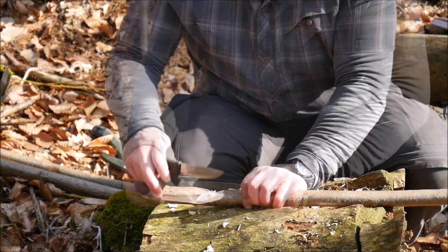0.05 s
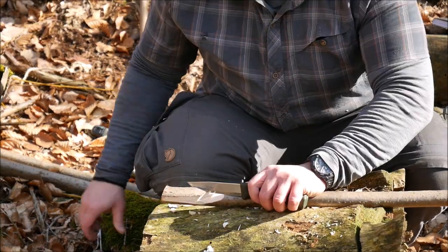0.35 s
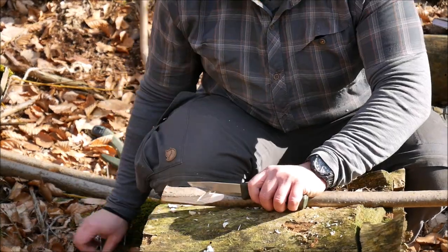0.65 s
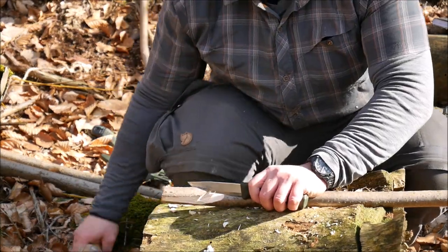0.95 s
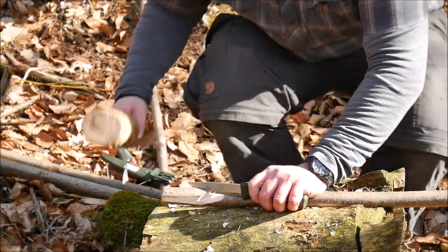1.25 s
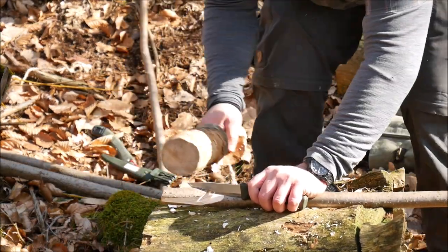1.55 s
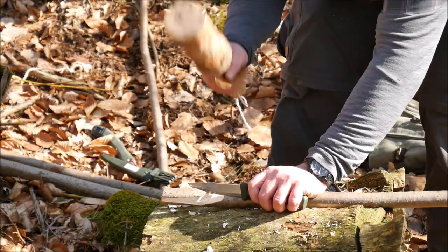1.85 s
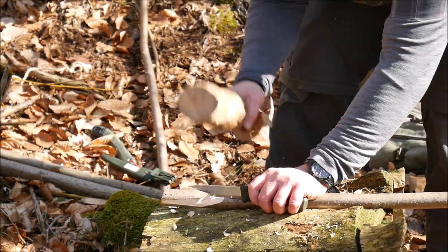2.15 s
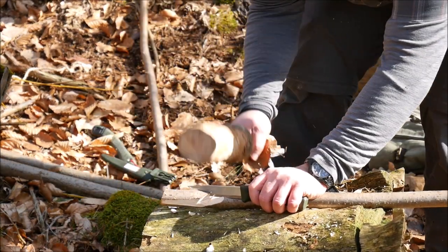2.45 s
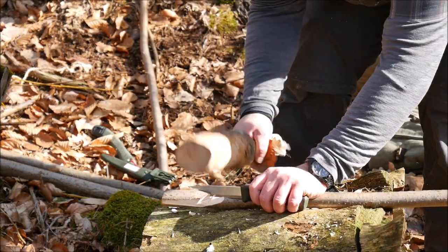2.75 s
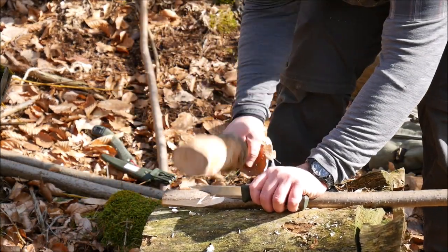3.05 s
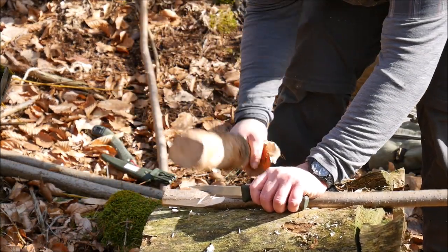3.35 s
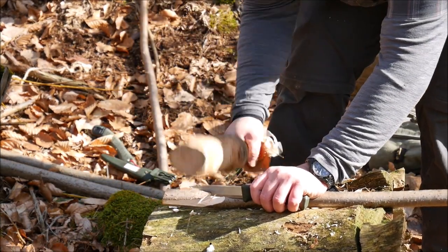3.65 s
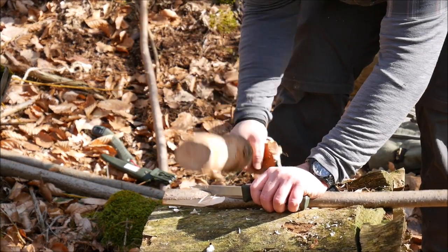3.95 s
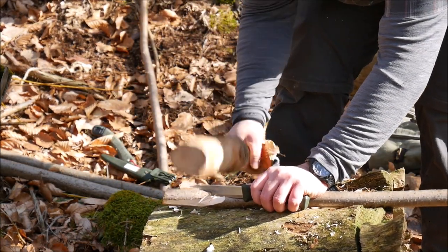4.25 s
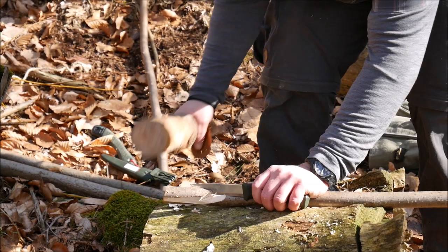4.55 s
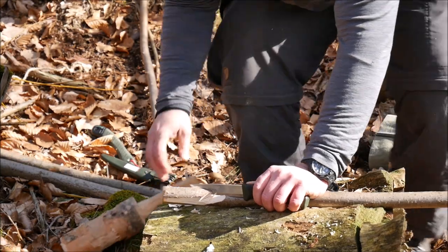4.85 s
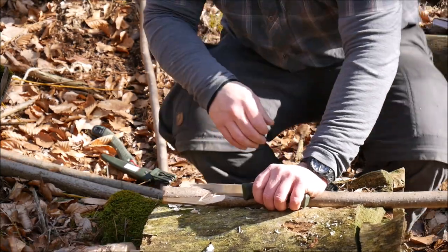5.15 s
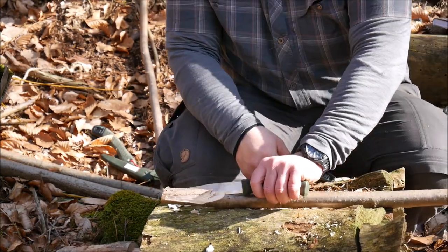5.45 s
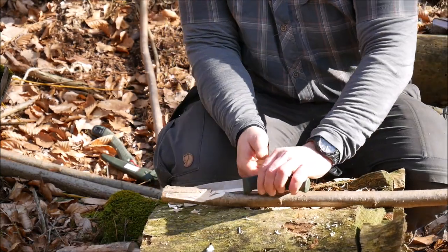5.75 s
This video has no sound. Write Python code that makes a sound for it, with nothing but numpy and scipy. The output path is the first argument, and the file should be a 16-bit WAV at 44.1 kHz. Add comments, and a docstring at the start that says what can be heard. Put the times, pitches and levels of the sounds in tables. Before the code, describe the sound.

Eight sharp, dead knocks of a wooden club driving a knife through a stick, with dry leaves rustling in a quiet, breezy wood.

```python
"""A breeze rumbles on the microphone in a quiet wood, and dry leaves stir as a man picks up a wooden club.
He knocks a knife through a stick lying on a log: eight sharp, dead blows, each exciting heavily damped
modes of wood and steel and overloading the microphone. He drops the club, which thuds and rings briefly,
and kneels again. His movements rustle leaves, snap twigs and brush his shirt. Behind him the breeze dies
away, faint far tones come and go, and one slow gust passes through the treetops."""
import sys
import numpy as np
from scipy import signal
from scipy.fft import rfft, irfft, next_fast_len
from scipy.io import wavfile
from scipy.ndimage import map_coordinates

SR = 44100
rng = np.random.default_rng(int(sys.argv[2]) if len(sys.argv) > 2 else 0)


def to_wav(s):
    """Save 16-bit WAV."""
    ch = np.atleast_2d(s).T  # columns
    pcm = np.round(np.clip(ch, -1, 1) * 32767)  # PCM
    wavfile.write(sys.argv[1], SR, pcm.astype(np.int16))


N = 265482

# The club strikes the knife's back; where it lands sets how strongly each part responds.
# Each row: start in seconds, then strength, knock, club bending, steel and crack, all in relative dB.
BLOW_EVENTS = [(2.1082, 5.5, -13, -7.5, 0.5, -7), (2.4791, 3.6, -3.5, -8, -5, 4.5),
               (2.7923, 3, -3, -8, 3, 2), (3.096, 0.5, 1, -11, -12, 4), (3.39, 1.6, -2.5, -13.5, 9.5, -0.5),
               (3.697, 0, 0.5, -16, 5, -10), (3.9938, 3.5, -3, -16, 5, 1.5),
               (4.2968, 0.5, -2.5, -15.5, 2, -5)]
# Modes of the stick on the log. Each row: frequency in Hz, relative level in dB, t60 in seconds.
STICK_MODES = [(162.3, -23.5, 0.065), (255.4, -17, 0.034), (325.4, -24.5, 0.057), (482, -24, 0.03),
               (764, 4, 0.011)]
# Modes of the knife in its cut. Each row: frequency in Hz, relative level in dB, t60 in seconds.
KNIFE_MODES = [(845, -22.5, 0.077), (965, 3, 0.014), (1246, -4, 0.0036), (1554, -11, 0.015),
               (1630, -12.5, 0.034), (1753, -11, 0.011), (2093, -3, 0.012), (2740, -10, 0.012),
               (2950, -12.5, 0.02), (3275, -11.5, 0.013), (3820, -42, 0.013), (4250, -15, 0.015),
               (4727, -14, 0.0088), (6540, -16.5, 0.0068)]
# First contact of club and knife. Each row: frequency in Hz, gain in dB.
CONTACT_SPECTRUM = [(300, -50), (1500, 16.5), (3500, -12), (5500, -2), (7000, -14.5), (8500, -27),
                    (10500, 3.5), (15000, -37)]
# Wood splitting under the edge. Each row: frequency in Hz, gain in dB.
FIBRE_SPECTRUM = [(300, -16.5), (700, -30.5), (1300, 2), (1900, 0.5), (2700, 2.5), (3600, -5), (4600, -8.5),
                  (5500, -17), (12000, -26.5)]
# Sound returned by ground and trunks. Each row: frequency in Hz, gain in dB.
SCATTER_SPECTRUM = [(100, -5), (170, 12), (260, -18), (450, -2), (850, -8), (1300, -2.5), (2100, -11.5),
                    (3200, -6.5), (5000, -8.5), (8000, -9.5), (12000, -6.5)]
# The loose club bumps log and ground.
# Each row: start in seconds, ring level in dB, ring frequency in Hz, t60 in seconds, thud gain in dB.
CLUB_BUMPS = [(0.916, -25.5, 1147, 0.06, -24), (0.959, -23, 1197, 0.11, -54),
              (4.7772, -23.5, 1195, 0.14, -0.5)]
# Modes of the club's thud. Each row: frequency in Hz, relative level in dB, t60 in seconds.
THUD_MODES = [(105, -18, 0.15), (324, -10, 0.011), (505, -15.5, 0.0045), (876, -5, 0.0038),
              (990, -21, 0.013)]
# A soft contact, which passes little treble. Each row: frequency in Hz, gain in dB.
MOSS_SPECTRUM = [(50, -43.5), (200, -1.5), (1100, 7), (1400, -9), (5000, -45)]
# Boots and knees settle. Each row: start in seconds, relative level in dB, centre frequency in Hz.
STEP_EVENTS = [(1.493, -37.5, 245), (1.646, -34.5, 242), (1.692, -42.5, 330), (2.671, -38, 940),
               (4.992, -47, 304)]
# Soil under load. Each row: multiple of the centre frequency, gain in dB.
SOIL_SPECTRUM = [(.1, -22), (.3, -5), (1, 5.5), (2, -3.5), (4, -10), (13, -34)]
# Twigs break. Each row: start in seconds, relative level in dB, centre frequency in Hz, t60 in seconds.
SNAP_EVENTS = [(0.8736, -19, 3100, 0.0023), (0.9586, -24, 3760, 0.019), (1.1433, -25.5, 2570, 0.011),
               (1.1815, -25.5, 4130, 0.013), (1.2616, -28.5, 3580, 0.01), (1.3942, -25.5, 2540, 0.0045),
               (1.7192, -20, 3800, 0.028), (2.0137, -29.5, 3700, 0.023), (2.6547, -30, 3000, 0.024),
               (2.673, -23.5, 5240, 0.028), (2.938, -31, 2900, 0.023), (3.817, -37.5, 7000, .012),
               (4.236, -42, 7000, .012), (4.451, -40.5, 6000, 0.024), (4.7762, -15, 2660, 0.02),
               (4.8214, -26, 4320, .02), (5.0327, -20, 2640, 0.012), (5.153, -20, 3140, 0.066),
               (5.249, -34, 6500, 0.0091), (5.492, -41, 6000, 0.014), (5.547, -34, 2750, .008)]
# A breaking twig. Each row: multiple of the centre frequency, gain in dB.
TWIG_SPECTRUM = [(.125, -19), (.5, -5), (1, 3), (2, -12), (4, -16.5)]
# A hand, knee or boot presses into the leaves.
# Each row: end of the rise in seconds, relative level in dB, then rise, hold and settling t60 in seconds.
LEAF_STIRS = [(0.575, -58.5, 0.043, 0.069, .07), (0.848, -46.5, 0.027, 0.013, 0.11),
              (0.904, -48.5, .025, 0.17, 0.56), (1.232, -60.5, 0.13, 0.056, 1.7),
              (1.483, -44, 0.055, 0.027, 0.79), (1.696, -56, 0.071, 0.022, 1.15),
              (4.771, -42.5, 0.0051, 0.0038, 0.26), (4.927, -49, 0.049, 0.019, 0.28),
              (5, -48, 0.034, 0.084, 0.35), (5.274, -57, 0.033, 0.019, 0.62)]
# Dry leaves. Each row: frequency in Hz, relative spectral density in dB.
LEAF_SPECTRUM = [(100, -25.5), (300, -7), (900, -2), (1700, -6), (2900, -1), (4500, -6.5), (7000, -13.5),
                 (11000, -11.5), (15500, -19)]
# An arm brushes the shirt. Each row: middle in seconds, half-width in seconds, level in dB.
SLEEVE_BRUSHES = [(0.18, 0.15, -48), (5.728, 0.042, -54.5), (6.01, 0.13, -49)]
# Rubbing cloth. Each row: frequency in Hz, relative spectral density in dB.
CLOTH_SPECTRUM = [(150, 3.5), (400, 7.5), (1000, 5.5), (1600, 4), (2800, 0), (4500, -5), (7000, -18),
                  (15000, -20)]
# The distant rush of air. Each row: frequency in Hz, relative spectral density in dB.
RUSH_SPECTRUM = [(30, 5.5), (90, 1.5), (260, -7.5), (500, -4.5), (780, 0), (1150, -3), (1700, -13.5),
                 (4000, -21), (8000, -29), (15000, -37)]
# Wind in the crowns. Each row: frequency in Hz, relative spectral density in dB.
TREETOP_SPECTRUM = [(700, 0.5), (1500, 6), (2000, 2), (2700, 1), (3100, 3.5), (3700, -5), (5000, -8.5),
                    (7000, -46), (15000, -54)]
# Wind on the microphone. Each row: frequency in Hz, relative spectral density in dB.
BREEZE_SPECTRUM = [(8, 0.5), (25, -8.5), (50, -12.5), (100, -28.5), (250, -66), (1000, -100)]
# Far-off tones.
# Each row: middle in seconds, nominal length in seconds, frequency in Hz, half-width in Hz, level in dB.
FAR_TONES = [(0.381, 0.23, 1550, 140, -60), (2.35, 1.1, 860, 33, -73), (3.705, 1.06, 3125, 92, -63.5),
             (3.996, 0.84, 713, 51, -60.5), (5.497, 1.3, 770, 20, -63.5), (5.599, 1, 1103, 22, -62),
             (5.97, 0.4, 918, 13, -56.5)]


def knife_blows():
    """Impact excites damped modes in club, knife and stick; contact and splitting fibres add noise."""
    out, t = np.zeros(N), np.arange(SR // 6) / SR
    bend_hz, bend_t60_s = 1199, 0.025  # the club's lowest bending mode, damped by the firm grip
    thump_hz, knock_hz, clack_hz, bite_hz, steel_hz, crack_hz = 302, 920, 2050, 2840, 4560, 8500
    click = coloured(signal.unit_impulse(len(t)), CONTACT_SPECTRUM)
    for count, (start, db, knock_db, bend_db, steel_db, crack_db) in enumerate(BLOW_EVENTS):
        stick = ringing(STICK_MODES, t, spread_db=0.5, detune=0.0019)
        knife = ringing(KNIFE_MODES, t, spread_db=1.65, detune=0.0085)
        ring = amp(-2.47) * (stick - knife)  # the stick is pushed down, the knife rebounds
        bend = amp(bend_db) * np.sin(2 * np.pi * bend_hz * t) * fade(t, bend_t60_s)
        crack = amp(-7.5) * burst(CONTACT_SPECTRUM, t, t60=0.0056) - amp(-6.5) * click
        crunch = amp(8.5) * burst(FIBRE_SPECTRUM, t, t60=0.011)
        clack_db = 0.24 * count  # each later blow has slightly more clack near 2 kHz
        colour = [(thump_hz, 1.5), (knock_hz, knock_db), (clack_hz, clack_db),
                  (bite_hz, 0.7), (steel_hz, steel_db), (crack_hz, crack_db)]
        blow = amp(db) * coloured(ring - bend + crack + crunch, colour)
        echo = forest_echo(blow, t, wet_db=-20, t60=0.078, trunk_s=0.047, trunk_db=-20)
        add(out, start, blow + echo)
    return out


def loose_club():
    """Free vibration: without a firm grip the club's bending mode rings longer, over a dull thud."""
    out, t = np.zeros(N), np.arange(SR // 4) / SR
    for start, ring_db, hz, t60, thud_db in CLUB_BUMPS:
        ring = amp(ring_db) * np.sin(2 * np.pi * hz * t) * fade(t, t60)
        ground = ringing(THUD_MODES, t, spread_db=0.5, detune=0.01)
        thud = amp(thud_db) * coloured(ground, MOSS_SPECTRUM)
        echo = forest_echo(thud, t, wet_db=-17, t60=0.039, trunk_s=0.04, trunk_db=-30)
        add(out, start, ring + thud + echo)
    return out


def forest_echo(x, t, wet_db, t60, trunk_s, trunk_db):
    """Diffuse scattering from the leaf floor gives a short tail; reflection from trunks, one dull echo."""
    tail = noise(SCATTER_SPECTRUM, len(t)) * fade(t, t60) * (1 - np.exp(-t / 0.0019))
    wet = amp(wet_db) * signal.fftconvolve(x, tail / np.linalg.norm(tail))[:len(t)]
    reflection = coloured(x, [(190, -1), (400, -21), (800, -49), (3000, -19), (9000, -43)])
    add(wet, trunk_s, amp(trunk_db) * reflection)
    return wet


def twig_snaps():
    """Brittle fracture: a dry twig gives a broadband tick and a short crumble."""
    out, t = np.zeros(N), np.arange(SR // 10) / SR
    for start, db, hz, t60 in SNAP_EVENTS:
        colour = [(hz * ratio, gain) for ratio, gain in TWIG_SPECTRUM]
        tick = burst(colour, t, t60)
        crumble = amp(-8) * burst(colour, t, t60=0.075)
        add(out, start, amp(db + 6.5) * (tick + crumble))
    return out


def steps():
    """Inelastic impact: soft soil yields under the man's weight with a low puff."""
    out, t = np.zeros(N), np.arange(SR // 5) / SR
    onset = 1 - np.exp(-t / 0.0017)
    for start, db, hz in STEP_EVENTS:
        colour = [(hz * ratio, gain) for ratio, gain in SOIL_SPECTRUM]
        add(out, start, amp(db + 23.5) * burst(colour, t, t60=0.058) * onset)
    return out


def leaf_rustle():
    """Incoherent sources add in power: each stir of the leaves swells, holds and settles."""
    power, now = np.zeros(N), np.arange(N) / SR
    rise_db = 16  # growth over one rise time
    for peak_s, db, rise, hold, t60 in LEAF_STIRS:
        attack = amp(-rise_db * np.maximum(peak_s - now, 0) / rise)
        settling = fade(np.maximum(now - peak_s - hold, 0), t60)
        power += (amp(db) * attack * settling) ** 2
    swish = amp(5.5) * noise(LEAF_SPECTRUM, N) * amp(1.95 * wobble(110))
    crackle = amp(1) * leaf_crackle(per_s=700)
    strays = amp(-71.5) * leaf_crackle(per_s=35)  # single leaves crack under his shifting weight
    return np.sqrt(power) * (swish + crackle) + strays


def leaf_crackle(per_s):
    """Shot noise of rms 1: leaves crack independently, at random moments and strengths."""
    ticks = rng.standard_normal(N) * (rng.random(N) < per_s / SR)
    return unit(coloured(ticks, LEAF_SPECTRUM))


def sleeves():
    """Sliding friction between arm and shirt gives soft swells of noise."""
    now = np.arange(N) / SR
    swells = sum(amp(db) * np.exp(-((now - middle) / half) ** 2) for middle, half, db in SLEEVE_BRUSHES)
    return swells * noise(CLOTH_SPECTRUM, N)


def wind():
    """Turbulence makes wavering noise: a far rush, a gust in the treetops, a breeze on the microphone."""
    now = np.arange(N) / SR
    gust_s, gust_half_s, waver_per_s = 4.32, 1.68, 7
    gust = np.exp(-((now - gust_s) / gust_half_s) ** 2)
    breeze_db = np.interp(now, [1.67, 2.47], [-46.5, -60.5])  # the breeze dies down to a lull
    rush = amp(-53 - 0.4 * gust + 0.8 * wobble(waver_per_s)) * noise(RUSH_SPECTRUM, N)
    treetops = amp(-59.5 + 7.5 * gust + 0.8 * wobble(waver_per_s)) * noise(TREETOP_SPECTRUM, N)
    breeze = amp(breeze_db + 3 * wobble(waver_per_s)) * noise(BREEZE_SPECTRUM, N)
    return rush + treetops + breeze


def far_tones():
    """Narrowband noise: distance blurs each tone into a wavering band that swells and fades."""
    out = np.zeros(N)
    for middle, length, hz, width, db in FAR_TONES:
        size = int(1.3 * length * SR)
        band = [(hz - 3 * width, -80), (hz - width, -14), (hz, 0),
                (hz + width, -14), (hz + 3 * width, -80)]
        swell = signal.windows.tukey(size, 0.5)
        add(out, middle - size / SR / 2, amp(db) * swell * noise(band, size))
    return out


def ringing(modes, t, spread_db, detune):
    """Modal superposition: damped sinusoids, at slightly new strengths and pitches each time."""
    hz, db, t60 = np.transpose(modes)[:, :, None]
    strength, shift = rng.standard_normal((2, len(modes), 1))
    tones = np.sin(2 * np.pi * hz * (1 + detune * shift) * t)
    return np.sum(amp(db + spread_db * strength) * tones * fade(t, t60), axis=0)


def burst(points, t, t60):
    """A decaying noise transient of energy 1, coloured by the (Hz, dB) points."""
    puff = coloured(rng.standard_normal(len(t)) * fade(t, t60), points)
    return puff / np.linalg.norm(puff)


def noise(points, size):
    """Spectral shaping: white noise weighted by the (Hz, dB) points, at rms 1."""
    padded = next_fast_len(size, True)
    spectrum = rfft(rng.standard_normal(padded)) * response(points, padded)
    return unit(irfft(spectrum, padded)[:size])


def coloured(x, points):
    """Minimum-phase filtering of x, with the (Hz, dB) points as its gain."""
    size = 4096
    cepstrum = irfft(np.log(response(points, size)))
    cepstrum[1:size // 2] *= 2  # folding the cepstrum makes the filter causal
    cepstrum[size // 2 + 1:] = 0
    impulse_response = irfft(np.exp(rfft(cepstrum)))
    return signal.oaconvolve(x, impulse_response)[:len(x)]


def response(points, size):
    """Gain at each FFT bin, interpolated from (Hz, dB) points on a log frequency axis."""
    hz, db = np.transpose(points)
    bins_hz = np.fft.rfftfreq(size, 1 / SR)
    return amp(np.interp(np.log(bins_hz + 1), np.log(hz + 1), db))


def wobble(rate):
    """Random modulation: a smooth curve with rate knots a second."""
    knots = rng.standard_normal(int(N * rate / SR) + 4)
    return map_coordinates(knots, [np.arange(N) * rate / SR])


def fade(t, t60):
    """Exponential decay: 60 dB down after t60."""
    return amp(-60 * t / t60)


def amp(db):
    """Decibels to amplitude ratio."""
    return 10 ** (np.asarray(db) / 20)


def unit(x):
    """Normalisation to rms 1."""
    return x / np.sqrt(np.mean(x ** 2) + 1e-20)


def add(track, start, sound):
    """Superpose a sound on the track from start, in seconds."""
    part = track[round(start * SR):][:len(sound)]
    part += sound[:len(part)]


def scene():
    """Superposition: all sources sum in the centre; each channel has its own faint hiss."""
    man = knife_blows() + loose_club() + steps() + twig_snaps() + leaf_rustle() + sleeves()
    background = wind() + far_tones()
    hiss_spectrum = [(30, 8), (150, 12), (1000, 3.5), (4000, 3.8), (15000, 3)]
    hiss = np.array([amp(-67.5) * noise(hiss_spectrum, N) for _ in range(2)])
    return man + background + hiss


def record(dry):
    """Saturation flattens the blows near full scale; a steep low-pass filter limits the treble."""
    ceiling, cutoff_hz = 0.96, 15350
    clipped = dry / (1 + np.abs(dry / ceiling) ** 6) ** (1 / 6)
    padded = next_fast_len(N + SR // 4, True)
    low_pass = 1 / np.sqrt(1 + (np.fft.rfftfreq(padded, 1 / SR) / cutoff_hz) ** 120)
    return irfft(rfft(clipped, padded) * low_pass, padded)[:, :N]


dry = scene()
out = record(dry)
to_wav(out)
```